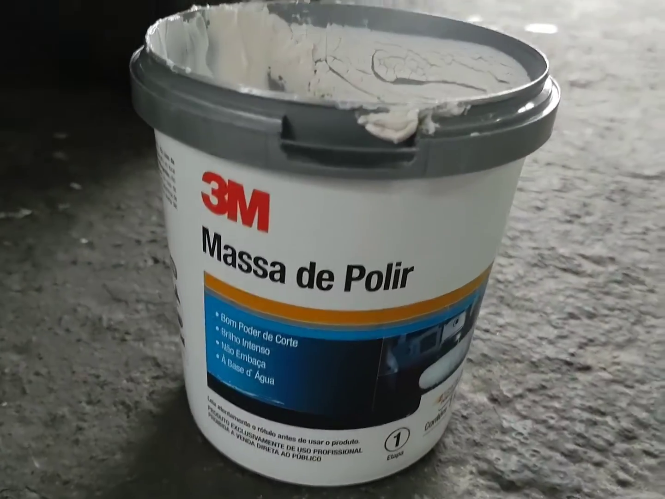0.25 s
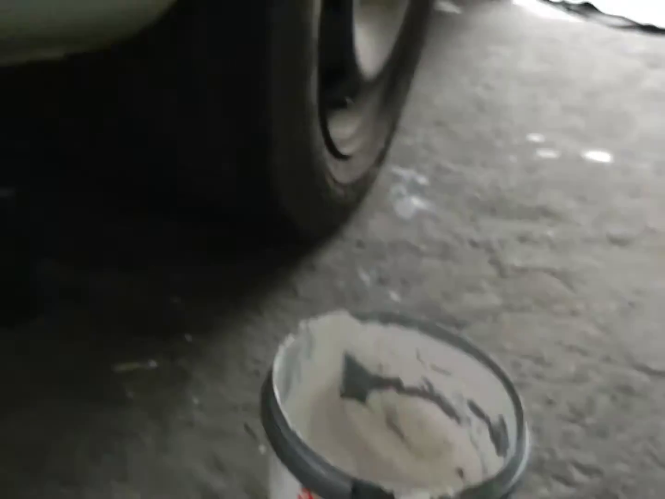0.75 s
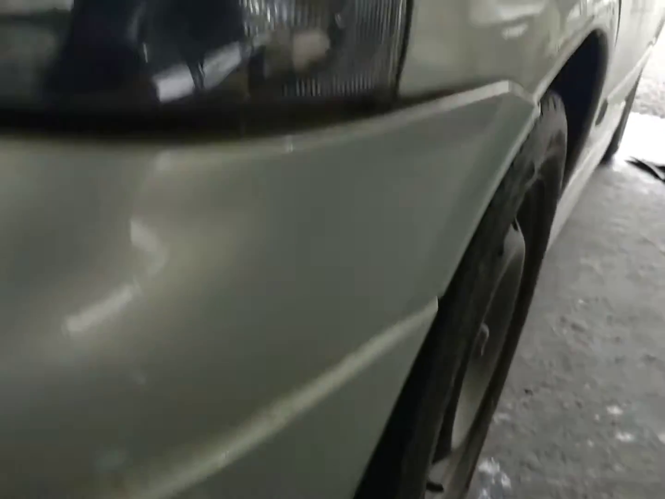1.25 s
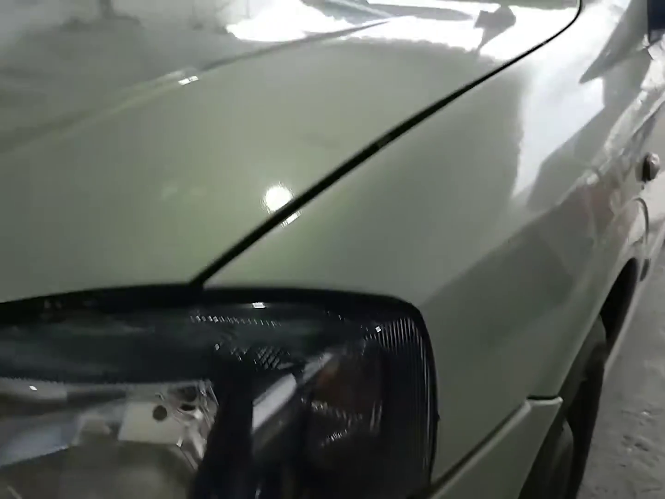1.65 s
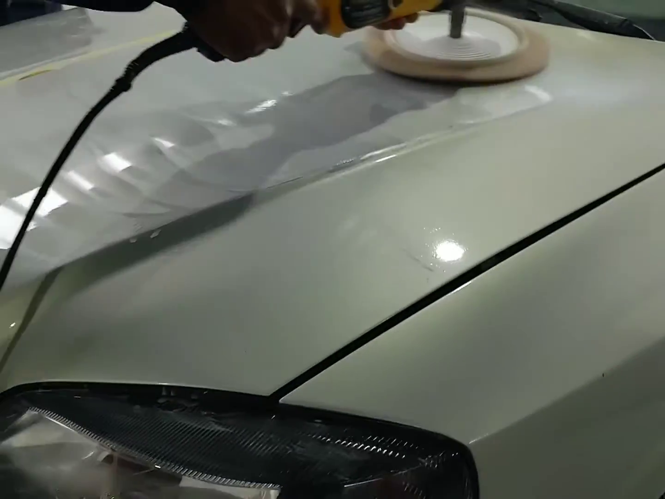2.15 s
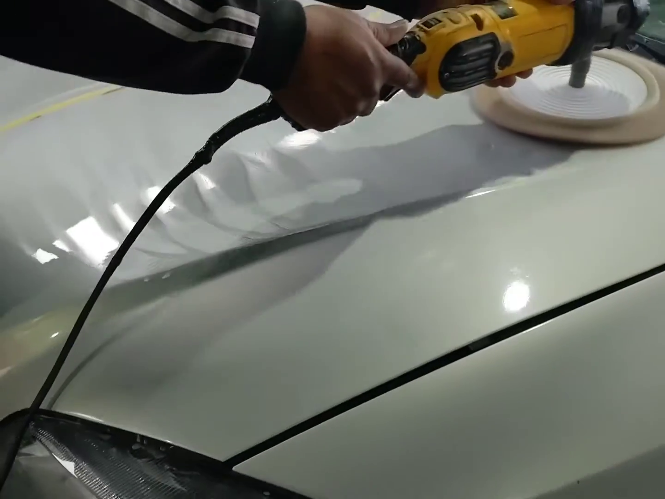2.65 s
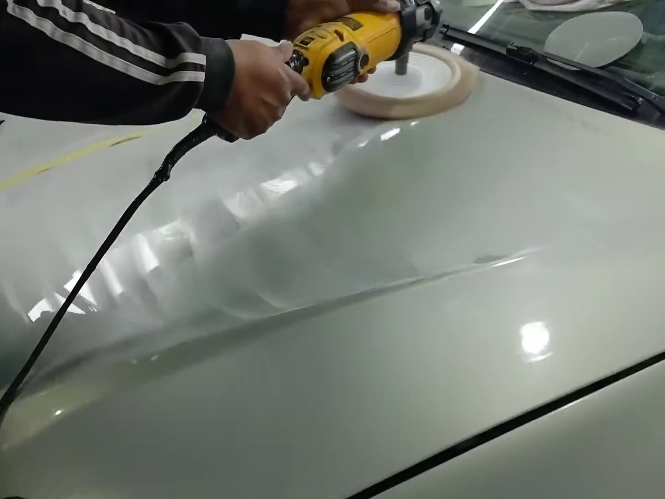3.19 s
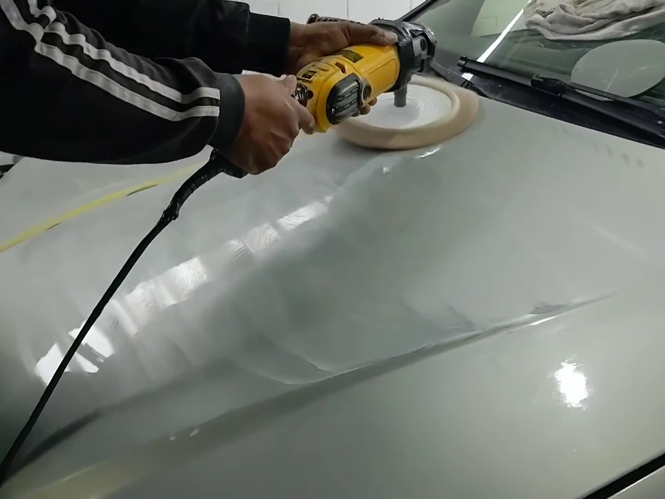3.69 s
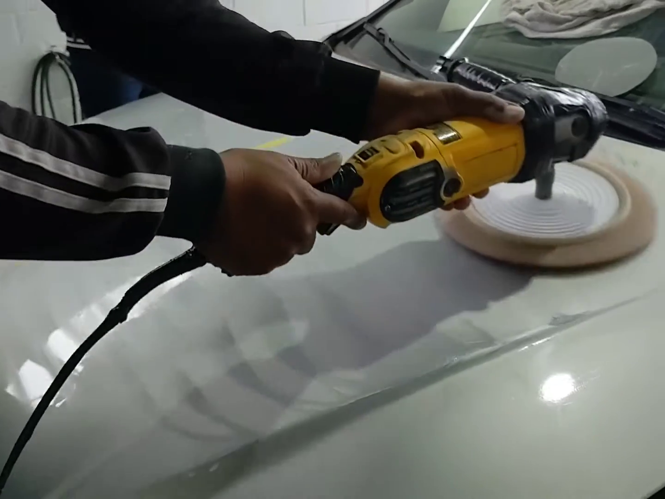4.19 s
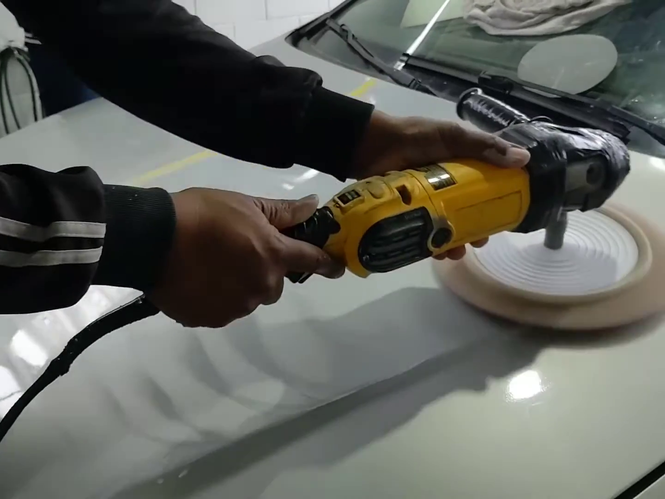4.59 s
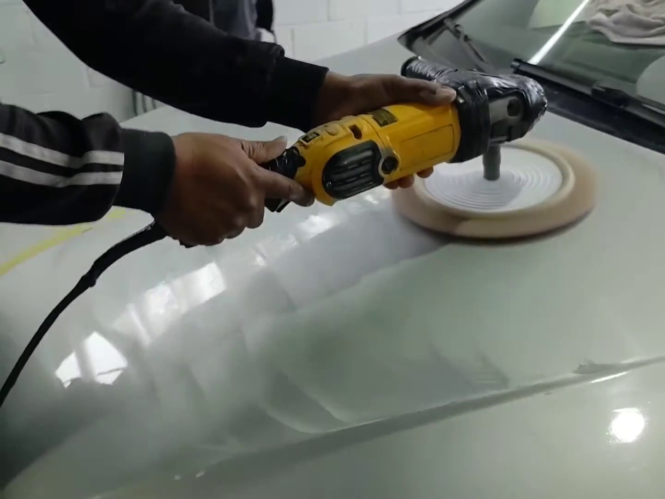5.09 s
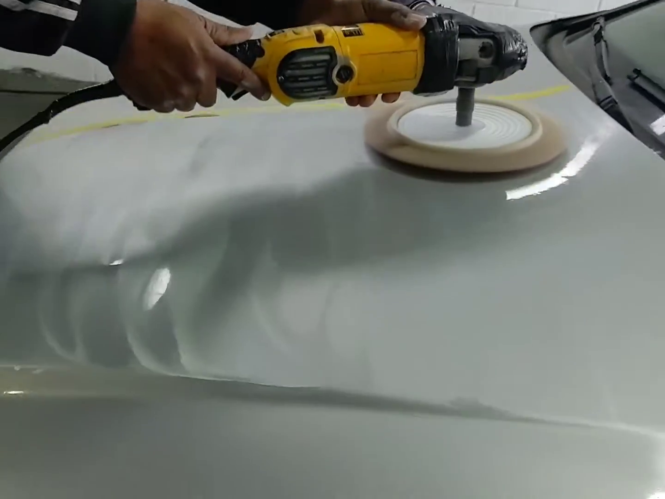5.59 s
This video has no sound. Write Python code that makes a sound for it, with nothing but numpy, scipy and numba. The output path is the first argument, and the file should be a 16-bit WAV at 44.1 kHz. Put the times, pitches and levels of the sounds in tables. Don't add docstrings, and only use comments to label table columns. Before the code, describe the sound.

High motor whine and airy hiss of a buffing machine, its overtones swelling and fading as the phone rises and closes in.

```python
import sys
import numpy as np
from scipy import signal
from scipy.fft import rfft, irfft, next_fast_len
from scipy.io import wavfile
from scipy.ndimage import uniform_filter1d, map_coordinates
from numba import njit

SR = 44100
rng = np.random.default_rng(int(sys.argv[2]) if len(sys.argv) > 2 else 0)


def invert_db(level):
    return 10 ** (np.asarray(level, dtype=float) / 20)


def master(y):
    cut = np.clip(np.atleast_2d(y).T, -1, 1)
    pcm = np.round(cut * 32767)
    wavfile.write(sys.argv[1], SR, pcm.astype(np.int16))


N = 257347

T = np.arange(N) / SR
SLOW = np.arange(N // 256 + 2) * 256 / SR
FAST = next_fast_len(N)
HZ = np.fft.rfftfreq(FAST, 1 / SR)

SHAFT_HZ = 259
FIELD_HZ = 120
SPINDLE_RATIO = 6 / 49
LOAD_DB_PER_HZ, LOADED_HZ = .45, 256
COMB_DB = -3
GARAGE_DB = -39.5

# [t/s, f/Hz]
SPEED = [(0.0, 257.4), (0.31, 256.2), (0.49, 261.7), (1.12, 261), (1.36, 255.8), (1.67, 254.6),
         (1.97, 261.2), (2.71, 257.9), (2.86, 254.3), (3.64, 260.8), (3.77, 263.1), (4.22, 268.6),
         (4.5, 262.3), (4.66, 264.9), (4.88, 257), (5.22, 257.5), (5.7, 252.1), (5.84, 255.5)]
# [t/s, tool in sight, phone above bonnet, pad on crease, gear head close,
# backing away; all 0-1]
MOVES = [(0, 0.11, 0, 0.046, 0, 0.1), (1.15, 0.31, 0.13, 0, 0.044, 0), (1.4, .7, 0.077, 0.046, 0.047, 0),
         (1.67, 1, 0.005, 0.17, 0.15, 0.2), (1.95, 0.93, 0.39, 0.11, 0.065, 0),
         (2.5, .99, 0.91, 0.23, 0.075, 0), (2.9, 0.93, 1, 0.3, 0.12, 0.11),
         (3.3, 0.71, 0.94, 0.86, 0.24, 0), (3.9, 1, 0.68, 0.97, 0.17, 0.27), (4.17, 0.77, 1, 0.31, 1, 0.4),
         (4.7, 1, 0.96, 0.062, 1, 0.08), (5.3, .99, 0.85, 0.1, 0.87, 0.2),
         (5.84, 0.97, 0.96, 0.24, 0.92, 1)]
# [start t/s, end t/s]
RISE_S = [1.25, 1.64]

LEAD_ORDERS = [6, 7, 8, 9, 12, 16, 17, 19, 28, 36]
LEAD_DB = [-10, -1.5, -10, -25, -0.5, -2.5, 4.5, -4.5, 2.5, 2.5]
# [order, level/dB re rush around them]
WEAK_LINES = [(11, -4), (13, 1), (14, -6), (15, -7), (18, -1), (20, -8), (22, -9), (23, -13), (24, 2),
              (25, -3), (26, 3), (27, -5), (29, -12), (30, -5), (31, -3), (32, -2), (33, -6), (35, -8),
              (37, -10), (38, -10), (39, -10), (40, -5), (41, -15), (42, -3), (45, -11), (46, -9),
              (48, -14)]
# [order, lower level/dB, upper level/dB re line]
FIELD_SPLIT = [(6, -18, -5), (12, -7, -10), (24, -8, -11), (36, -2.5, -2.5)]
# [t/s, length/s, level/dB]
GEAR_SWELLS = [
    [(2.36, 0.16, -29), (3.55, 0.91, -28), (4.0, 0.31, -21), (4.25, .35, -20.5), (4.55, 0.46, -30.5)],
    [(.55, 0.23, -28), (1.23, .12, -26), (2.02, 0.59, -24), (2.43, 0.52, -19.5), (2.85, .35, -25.5),
     (3.22, 0.5, -21), (3.78, .2, -21.5), (4.16, 0.16, -27), (4.7, 0.61, -26), (5.27, 0.64, -28),
     (5.55, 0.14, -25), (5.83, 0.21, -20.5)],
    [(.12, 0.4, -31), (2.3, .25, -38), (3.2, 0.19, -32.5), (3.55, 0.49, -30.5), (3.9, .2, -33),
     (4.55, 0.33, -22.5), (4.86, 0.57, -25), (5.1, 0.24, -20.5)],
    [(4.22, 0.3, -19.5), (4.58, 0.36, -20.5), (5.0, 0.43, -18.5), (5.45, 0.49, -19.5), (5.8, .3, -23)],
]
# [t/s, length/s, level/dB]
MOTOR_SWELLS = [
    [(1.8, 0.42, -27.5), (2.5, 0.16, -32), (2.78, 0.11, -26.5), (4.2, 0.54, -16.5), (4.75, 0.93, -26.5),
     (5.6, 0.77, -19.5)],
    [(.83, 0.18, -24), (1.55, 0.69, -21), (2.7, 0.74, -23.5), (3.33, 0.33, -19), (3.95, 0.28, -24),
     (4.58, 0.18, -19.5), (5.28, 0.23, -23.5)],
    [(1.55, 0.44, -13), (2.6, .8, -20.5), (3.25, .3, -18), (3.61, .15, -22), (4.72, 0.29, -19),
     (5.72, .3, -19)],
    [(2.5, 0.32, -20.5), (2.78, 0.24, -22.5), (3.2, 0.17, -27), (4.5, 0.68, -21.5), (5.5, 1, -24.5)],
    [(1.6, .3, -24), (2.08, 0.37, -25), (2.8, 0.99, -21), (4.2, 1, -26), (5.2, 0.42, -17)],
]
# [f/Hz, phase/rad]
PORT_LEAD = [(1030, -.1), (1810, -1.5), (2350, -1), (2700, -1.5), (3270, 1.3), (4220, 1.4), (4650, .9),
             (6200, 3), (7300, 2.4)]

EDGES_HZ = [200, 720, 1430, 1950, 2730, 3770, 5350, 7700, 14100, 20000]
HIDDEN_DB = [
    -44,
    -42,
    -41.5,
    -37.5,
    -40.5,
    -33.5,
    -41.5,
    -52.5,
    -58.5,
]
# [sight/dB, above/dB, crease/dB, close/dB, away/dB]
LOUDER_DB = [(2.85, 4.5, 4.5, -2, 1.5), (6.5, 1.93, 7, -4.5, 3.5), (4.5, 10, 4, -0.6, -7.5),
             (8.5, 0.05, -4.5, 10.5, 0.7), (8, 1.9, 0.7, 4, 0), (4.5, 1.8, -0.5, 1.5, -0.5),
             (0.6, 9, -2, 2.1, 4.5), (8.5, 11, 3.4, 2.5, -2.3), (14.5, -7, 15, 18, -12)]
HIDDEN_PAN_DB = [3.5, -0.5, 0.4, 8.5, 1.5, 6, 1]
# [sight/dB, above/dB, crease/dB, close/dB, away/dB]
TURN_DB = [(-2, 1, -3.5, -5.5, 2), (-8, -0.5, 9.5, -1.5, 0), (-6, 8, -4.5, -6.5, -8),
           (-5.3, 5.5, -1, -5, -0.5), (1.5, 3.5, -1, -2.7, 4.5), (-2.2, -9, 6.5, 9.5, -1),
           (-7, 7, 11, 14, -16)]
# [t/s, length/s, gain/dB]
VENT_FLASHES = [(2.095, 0.36, 5.5), (2.744, 0.22, 3.5), (4.31, 0.37, -4), (5.18, .4, 1.5),
                (3.549, 0.45, -2.5), (4.848, 0.27, -3)]
# [start t/s, end t/s, multiple of spindle rate, level/dB]
PANEL_TONES = [(3.2, 3.68, 25, -33), (3.36, 3.8, 29, -34), (3.0, 3.5, 33, -39), (3.38, 4.02, 33, -32),
               (3.7, 3.92, 31.5, -33)]

# [f/Hz, density/dB per Hz]
AIR = [(250, -12), (850, -6), (1400, -16), (1560, -6), (1800, -4), (1950, -11), (2350, -4), (2700, -9),
       (3250, -7), (3750, -11), (4500, -9), (5500, -23), (6700, -14), (9400, -14), (11300, -28),
       (13200, -40), (15000, -27)]
# [f/Hz, level/dB]
TEETH = [(400, -10.5), (1050, -3), (1400, -2.5), (1700, 2), (2050, 4), (2320, 9), (2650, -6), (3000, -18),
         (4500, -11), (6000, -10.5)]
# [f/Hz, likeness 0-1]
ALIKE = [(40, .76), (80, .85), (160, .94), (350, .94), (750, .87), (1300, .15), (3100, .05)]

# [f/Hz, density/dB per Hz]
GARAGE = [(12, -55), (20, -25), (37, -19), (118, 2.5), (192, -0.5), (248, 0.5), (290, -14.5), (375, -1.5),
          (600, -27), (780, -36), (1320, -120)]
# [start t/s, end t/s, f/Hz, level/dB]
DRONES = [(.12, .9, 119.5, -43), (.8, 1.4, 119.5, -49), (4.4, 5.84, 119.5, -48), (-.1, .8, 259.5, -46.5),
          (1.16, 1.55, 218, -44), (1.45, 1.85, 220, -51), (1.2, 4.0, 377, -50)]
# [t/s, f/Hz, peak level/dB]
BUMP = (3.4, 160, -19.5)


def polisher():
    jitter = 1 + 0.001113 * walk(30, count=1)[0]
    turns = np.cumsum(stretch(curves(SPEED)[0] * jitter)) / SR
    moves = curves(MOVES)
    rush_db = np.array(HIDDEN_DB)[:, None] + np.array(LOUDER_DB) @ moves
    rush_db[6] += sum(db * bell(s, length) for s, length, db in VENT_FLASHES)
    turned_db = np.array(HIDDEN_PAN_DB)[:, None] + np.array(TURN_DB) @ moves
    pan_db = np.vstack([np.zeros((2, len(SLOW))), turned_db])
    lines = armature(turns, rush_db, pan_db)
    return lines + panel(turns) + rush(turns, rush_db, pan_db)


def armature(turns, rush_db, pan_db, lead_fade=.35, fade=.85, far_fade=.25, faint_db=-19):
    faint = [(k, faint_db + (43 - k) / 2 + 3 * rng.standard_normal()) for k in (43, 44, 47, 50, 51, 54)]
    leads = list(zip(LEAD_ORDERS, LEAD_DB))
    orders, over_db = np.transpose(leads + list(WEAK_LINES) + faint)
    part = np.searchsorted(EDGES_HZ, orders * SHAFT_HZ) - 1
    line_db = rush_db[part] + over_db[:, None]
    swells = list(GEAR_SWELLS) + list(MOTOR_SWELLS) + [[]]
    line_db[:len(leads)] = [swell(rest_db, events) for rest_db, events in zip(line_db, swells)]

    drifts = [walk(min(6 + 1.5 * k, 36), count=4).reshape(2, 2, -1) for k in orders]
    real, imag = np.stack(drifts, axis=1)
    share = np.where(np.arange(len(orders)) < len(leads), lead_fade, fade)[:, None, None]
    share = share + far_fade * np.interp(SLOW, RISE_S, [1, 0])
    lead_rad = along(PORT_LEAD, orders * SHAFT_HZ)[:, None, None] * np.array([[.5], [-.5]])
    direct = np.exp(1j * (2 * np.pi * rng.random((len(orders), 1, 1)) + lead_rad))
    size = (direct + share * (real + 1j * imag)) * np.sqrt(2 / (1 + 2 * share ** 2))
    size = size * invert_db(line_db[:, None]) * ears(pan_db[part])

    split_orders, split_signs, split_sizes = field_split(orders, size)
    signs = np.append(0 * orders, split_signs)
    orders = np.append(orders, split_orders)
    size = np.concatenate([size, split_sizes])
    rock_depth = stretch(np.interp(SLOW, RISE_S, [.15, .05]))
    rock = 1 + rock_depth * np.cos(2 * np.pi * SPINDLE_RATIO * turns)
    return rock * sines(2 * np.pi * turns, 2 * np.pi * FIELD_HZ * T, orders, signs, size)


def field_split(orders, size):
    load_db = LOAD_DB_PER_HZ * (LOADED_HZ - curves(SPEED)[0])
    split_orders, signs, sizes = [], [], []
    for k, lower_db, upper_db in FIELD_SPLIT:
        line = size[list(orders).index(k)]
        for sign, db in ((-1, lower_db), (1, upper_db)):
            split_orders.append(k)
            signs.append(sign)
            sizes.append(line * invert_db(db + load_db + 2.3 * walk(20, count=2)))
    return split_orders, signs, sizes


@njit
def sines(turns, field, orders, signs, size):
    out = np.zeros((2, len(turns)))
    for k in range(len(orders)):
        for i in range(len(turns)):
            j, f = i >> 8, (i & 255) / 256
            z = np.exp(1j * (orders[k] * turns[i] + signs[k] * field[i]))
            for ear in range(2):
                out[ear, i] += (z * (size[k, ear, j] * (1 - f) + size[k, ear, j + 1] * f)).real
    return out


def swell(rest_db, events):
    power = invert_db(2 * rest_db)
    power = power + sum(invert_db(2 * db) * bell(s, length) for s, length, db in events)
    return 10 * np.log10(power)


def panel(turns):
    out = 0
    for start, end, k, db in PANEL_TONES:
        level = invert_db(db + 2 * stretch(walk(9, count=1)[0]))
        out = out + gate(start, end) * level * np.sin(2 * np.pi * k * SPINDLE_RATIO * turns)
    return out


def rush(turns, rush_db, pan_db):
    spectrum = rfft(bounce(invert_db(COMB_DB) * spindle(turns) + air(turns)), FAST)
    gains = invert_db(rush_db + 0.98 * walk(17.6, count=len(rush_db)))[:, None] * ears(pan_db)
    out = 0
    for low, high, gain in zip(EDGES_HZ, EDGES_HZ[1:], gains):
        above_low = np.tanh(30 * np.log(HZ / low + 1e-9))
        above_high = np.tanh(30 * np.log(HZ / high + 1e-9))
        band = irfft(spectrum * (above_low - above_high) / 2, FAST)[:, :N]
        out = out + unit(band) * np.array([stretch(g) for g in gain])
    return out


def spindle(turns, wear_rate=1.22):
    hz = np.arange(1025) * SPINDLE_RATIO * SHAFT_HZ
    place = turns * SPINDLE_RATIO % 1 * 2048
    angle = 1.63 * stretch(walk(wear_rate, count=1)[0])
    out = 0
    for share in (np.cos(angle), np.sin(angle)):
        pattern = irfft(pair(along(TEETH, hz), hz) * (hz > 0))
        played = [map_coordinates(p, [place], order=1, mode="grid-wrap") for p in pattern]
        out = out + share * np.array(played)
    return unit(out)


def air(turns, throb=0.1):
    return noise(AIR) * (1 + throb * np.cos(2 * np.pi * turns))


def bounce(x, echoes=((.45, .6), (1.3, .55)), sway=.11):
    out = x.copy()
    treble = signal.sosfilt(signal.butter(2, 2600, "high", fs=SR, output="sos"), x)
    for ms, gain in echoes:
        lag = ms * SR / 1000 * np.exp(sway * walk(3.05, count=2))
        late = [map_coordinates(v, [np.arange(N) - stretch(d)], order=1) for v, d in zip(treble, lag)]
        out += gain * np.array(late)
    return out


def garage():
    out = invert_db(GARAGE_DB) * noise(GARAGE)
    ear_rad = np.array([[.2], [-.2]])
    for start, end, hz, db in DRONES:
        level = invert_db(db + 5 + 1.2 * stretch(walk(8, count=1)[0]))
        out = out + gate(start, end) * level * np.sin(2 * np.pi * hz * T + ear_rad)
    s, hz, db = BUMP
    return out + invert_db(db) * np.exp(-((T - s) / .0025) ** 2) * np.cos(2 * np.pi * hz * (T - s))


def noise(shape):
    return unit(irfft(pair(along(shape, HZ), HZ), FAST)[:, :N])


def pair(shape_db, hz):
    mid, side = rng.standard_normal((2, len(hz))) + 1j * rng.standard_normal((2, len(hz)))
    likeness = along(ALIKE, hz)
    mid, side = mid * np.sqrt(1 + likeness), side * np.sqrt(1 - likeness)
    return np.array([mid + side, mid - side]) * invert_db(shape_db)


def ears(pan_db):
    ratio = invert_db(np.stack([-2 * pan_db, 2 * pan_db], axis=1))
    return np.sqrt(2 / (1 + ratio))


def walk(rate, count):
    k = max(int(SR / 256 / rate), 1)
    w = uniform_filter1d(uniform_filter1d(rng.standard_normal((count, len(SLOW))), k), k)
    return w / w.std()


def bell(s, length):
    return np.exp(-2 * (2 * (SLOW - s) / length) ** 2)


def gate(start, end):
    return np.clip(np.minimum(T - start, end - T) / .08, 0, 1)


def curves(table):
    s, *columns = np.transpose(table)
    return np.array([np.interp(SLOW, s, c) for c in columns])


def stretch(slow):
    return np.interp(T, SLOW, slow)


def along(points, hz):
    at, value = np.transpose(points)
    return np.interp(np.log(hz + 1), np.log(at), value)


def unit(x):
    return x / np.sqrt(np.mean(x ** 2))


def scene():
    return polisher() + garage()


def band_limit(x):
    return signal.sosfilt(signal.butter(12, 15980, fs=SR, output="sos"), x)


def record(dry):
    rounded = np.tanh(0.56 * dry) / 0.63
    top_cut = signal.ellip(10, .3, 45, 15800, fs=SR, output="sos")
    mix = signal.sosfilt(top_cut, rounded)
    return band_limit(mix)


dry = scene()
out = record(dry)
master(out)
```